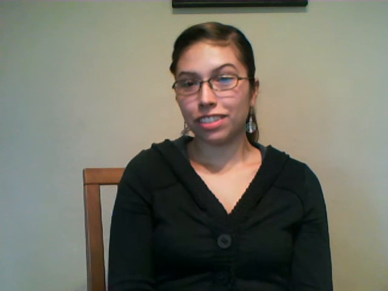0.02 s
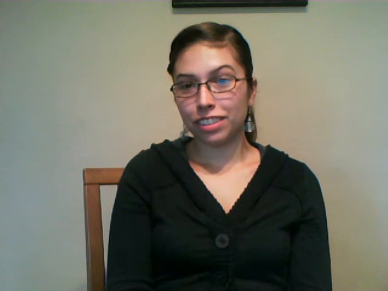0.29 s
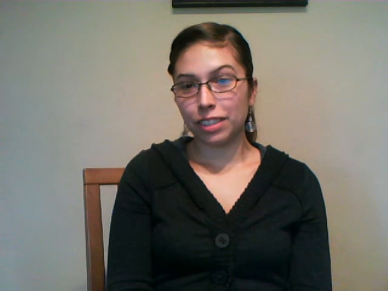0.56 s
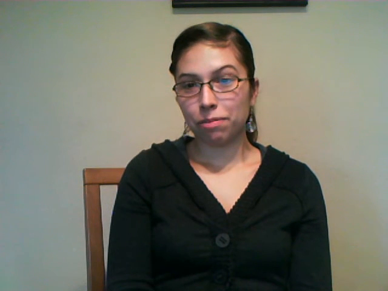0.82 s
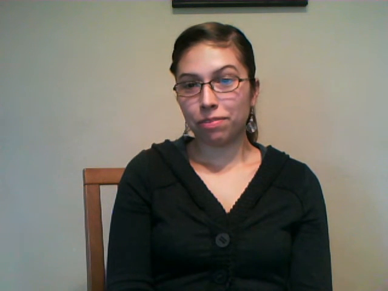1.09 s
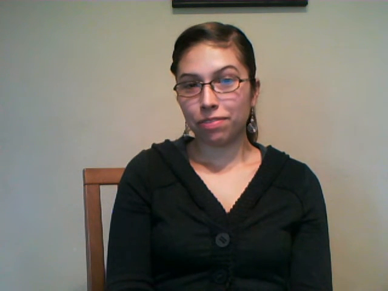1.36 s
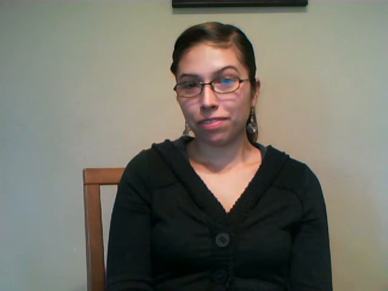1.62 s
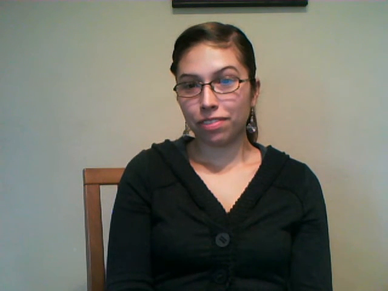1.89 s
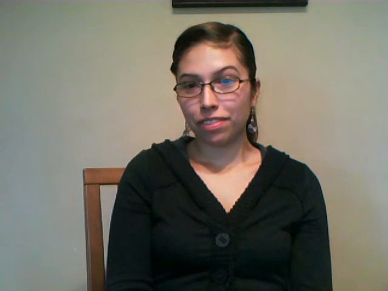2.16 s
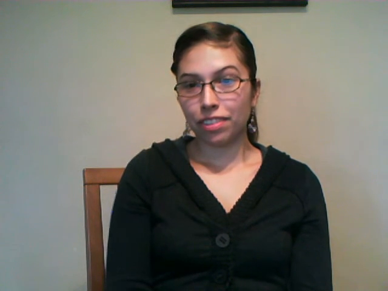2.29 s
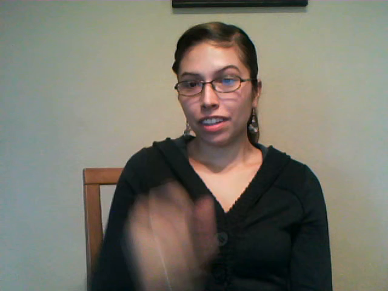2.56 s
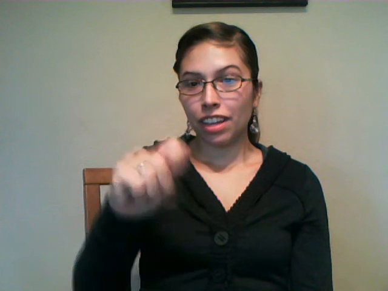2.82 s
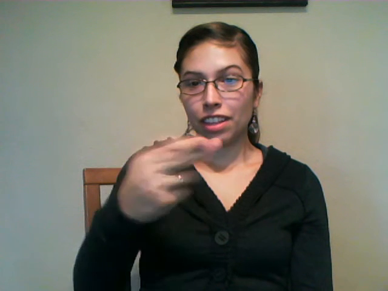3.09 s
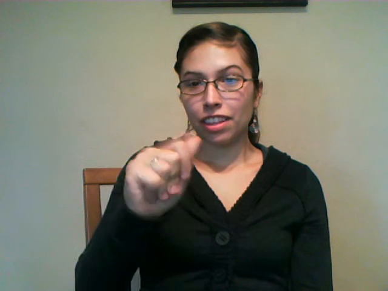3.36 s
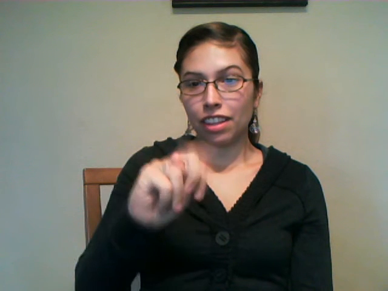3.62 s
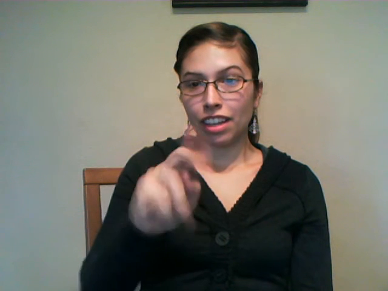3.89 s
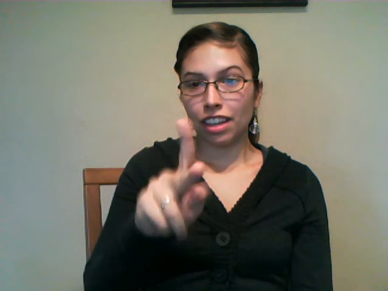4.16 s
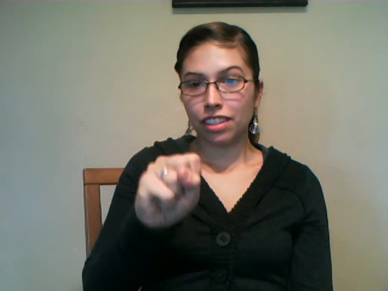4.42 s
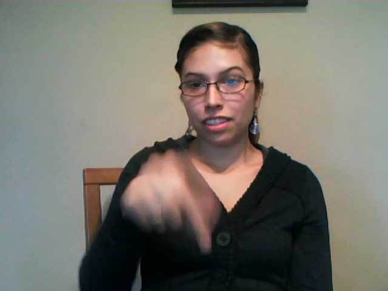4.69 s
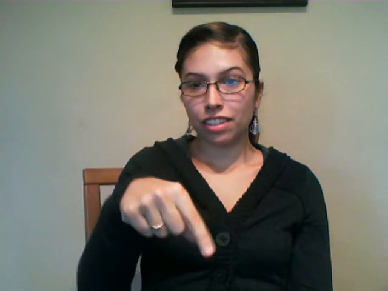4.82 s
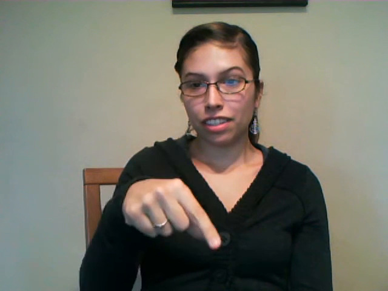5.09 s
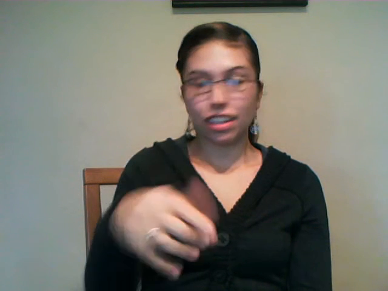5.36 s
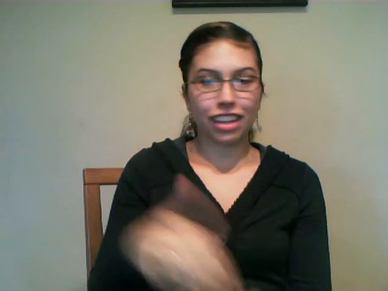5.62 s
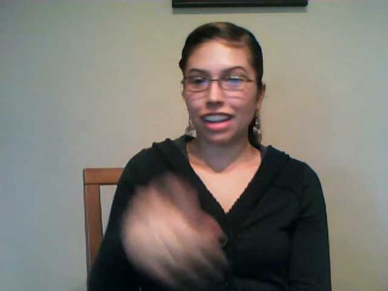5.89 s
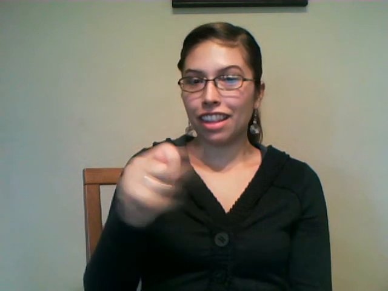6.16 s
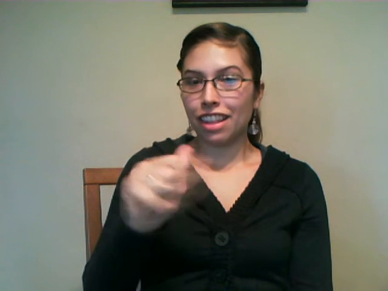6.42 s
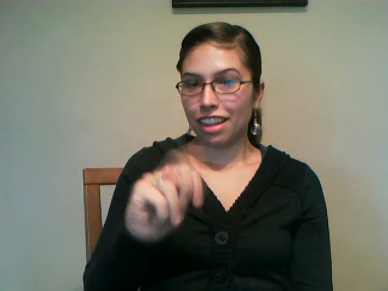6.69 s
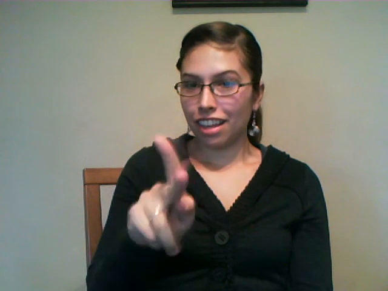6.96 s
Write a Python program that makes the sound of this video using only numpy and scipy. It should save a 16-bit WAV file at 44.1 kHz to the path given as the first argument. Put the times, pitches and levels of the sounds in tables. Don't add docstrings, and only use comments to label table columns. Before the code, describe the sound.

Steady low hum dominates throughout, with a slightly pulsating fan drone, a faint coil whine and smooth hiss. A tiny regular high-pitched interference tick runs evenly underneath. Dull soft bumps come early, then faint chair squeaks, small wooden creaks and cloth rubbing as the seated person moves their arms, clustering around five and a half seconds. Small indoor room, noisy built-in microphone, nobody talking.

```python
import sys
import numpy as np
from scipy import signal
from scipy.fft import rfft, irfft, next_fast_len
from scipy.io import wavfile
from scipy.ndimage import uniform_filter1d, map_coordinates

SR = 44100
rng = np.random.default_rng(int(sys.argv[2]) if len(sys.argv) > 2 else 0)


def amplitude_ratio(level_db):
    exponent = np.asarray(level_db, float) / 20
    return 10 ** exponent


def inscribe(sig):
    pcm = np.round(np.clip(np.atleast_2d(sig).T, -1, 1) * 32767)
    wavfile.write(sys.argv[1], SR, pcm.astype(np.int16))


N = 311963
T = np.arange(N) / SR


def wobble(rate_hz):
    knots = rng.standard_normal(int(N * rate_hz / SR) + 4)
    return map_coordinates(knots, [np.arange(N) * rate_hz / SR])


def swell(t, rise_s, fall_s):
    return np.exp(-(t / np.where(t < 0, rise_s, fall_s)) ** 2)


def filtered(x, response):
    size = next_fast_len(len(x) + 8192)
    hz = np.fft.rfftfreq(size, 1 / SR)
    return irfft(rfft(x, size) * response(hz), size)[:len(x)]


def drone(rate_hz, crest_s, harmonics, sway_rad, flutter_db, locked=False):
    turn = 2 * np.pi * rate_hz * (T - crest_s) + sway_rad * wobble(0.98)
    sound = np.zeros(N)
    for multiple, level_db in harmonics.items():
        free = multiple > 1 and not locked
        offset = rng.uniform(0, 2 * np.pi) * free
        sound += amplitude_ratio(level_db) * np.cos(multiple * turn + offset)
    return np.sqrt(2) * amplitude_ratio(flutter_db * wobble(3.1)) * sound


MAINS_HARMONICS = {1: -32, 3: -56, 4: -66, 5: -62, 6: -64, 7: -68, 8: -71, 9: -69}
FAN_A_HARMONICS = {1: -48, 3: -70, 4: -57, 6: -70, 7: -68, 8: -63, 12: -68, 13: -59, 16: -63, 20: -57, 24:
                   -64, 26: -66, 32: -78}
FAN_B_HARMONICS = {1: -49, 3: -65, 4: -62, 5: -71, 6: -65, 8: -71, 12: -69}
FAN_C_HARMONICS = {4: -59, 8: -55, 13: -68, 16: -64, 20: -57, 24: -65, 25: -66, 29: -73, 32: -78, 36: -74,
                   37: -77, 41: -78}
COIL_HARMONICS = {9: -76, 10: -76, 14: -83, 15: -80, 17: -81, 22: -86, 26: -86, 27: -78, 28: -82, 29: -88}


def machines():
    mains = drone(60.007, -.0006, MAINS_HARMONICS, sway_rad=.01, flutter_db=.1, locked=True)
    ballast = drone(120.014, .0008, {1: -51.5}, sway_rad=.05, flutter_db=.4)
    disk = drone(121.2, .0035, {1: -33.5}, sway_rad=.08, flutter_db=.15)
    pump = drone(59.39, .0078, {1: -50, 6: -67}, sway_rad=.05, flutter_db=.8)
    fan_a = drone(50.745, -.0009, FAN_A_HARMONICS, sway_rad=.01, flutter_db=.4)
    fan_b = drone(53.72, -.002, FAN_B_HARMONICS, sway_rad=.01, flutter_db=.4)
    fan_c = drone(43.476, 0, FAN_C_HARMONICS, sway_rad=.01, flutter_db=.4)
    coil = drone(228.213, 0, COIL_HARMONICS, sway_rad=.002, flutter_db=.3)
    return mains + ballast + disk + pump + fan_a + fan_b + fan_c + coil


# start_s, period_s, length_s, tone_hz
BUS_BURSTS = (.0112, .132872, .0305, 8000.01)


def bus():
    start_s, period_s, length_s, tone_hz = BUS_BURSTS
    tone_db, octave_db, edge_s = -49, -47, .0003
    since_s = (T - start_s + period_s / 2) % period_s - period_s / 2
    gate = np.clip(np.minimum(since_s, length_s - since_s) / edge_s + .5, 0, 1)
    tone = amplitude_ratio(tone_db) * np.cos(2 * np.pi * tone_hz * T)
    octave = amplitude_ratio(octave_db) * np.cos(2 * np.pi * 2 * tone_hz * T)
    return np.sqrt(2) * gate * (tone + octave)


# time of the peak in s, pitch_hz, level_db
FLOOR_THUDS = [(.44, 170, -49), (.56, 180, -43), (1.09, 190, -45), (2.45, 165, -52), (2.54, 175, -47),
               (3.07, 180, -51), (4.19, 190, -46), (4.52, 170, -51), (4.57, 180, -42), (5.58, 160, -52),
               (5.84, 190, -49), (6.498, 175, -39)]


def thuds():
    sound = np.zeros(N)
    for start_s, pitch_hz, level_db in FLOOR_THUDS:
        t = T - start_s
        shape = swell(t, rise_s=.015, fall_s=.024)
        sound += np.sqrt(2) * amplitude_ratio(level_db) * shape * np.sin(2 * np.pi * pitch_hz * t)
    return sound


def puffs(events, relative_width, rise_over_fall):
    sound = np.zeros(N + SR)
    t = np.arange(SR) / SR - .5
    for start_s, centre_hz, level_db, fall_s in events:
        resonance = lambda hz: np.exp(-2 * ((hz / centre_hz - 1) / relative_width) ** 2)
        shape = swell(t, rise_over_fall * fall_s, fall_s)
        puff = filtered(rng.standard_normal(SR), resonance) * shape
        gain = amplitude_ratio(level_db) * np.linalg.norm(shape) / np.linalg.norm(puff)
        sound[round(start_s * SR):][:SR] += gain * puff
    return sound[SR // 2:][:N]


# time of the peak in s, centre_hz, level_db, fall_s
CLOTH_RUSTLES = [(4.27, 2800, -61, .02), (4.45, 950, -49, .12), (4.56, 900, -44, .035),
                 (5.17, 2650, -55.5, .02), (5.525, 1650, -52, .04), (5.53, 2600, -59, .02),
                 (6.49, 880, -42, .03)]


def rustles():
    return puffs(CLOTH_RUSTLES, relative_width=.37, rise_over_fall=.8)


# time of the peak in s, centre_hz, level_db, fall_s
SEAT_KNOCKS = [
    (1.195, 950, -43, .012),
    (5.5, 800, -44, .025),
]


def knocks():
    return puffs(SEAT_KNOCKS, relative_width=.45, rise_over_fall=.15)


# time of the peak in s, pitch_hz, level_db, fall_s
FRAME_CREAKS = [(3.66, 905, -45, .018), (5.1, 860, -43, .009), (5.514, 1120, -41, .006),
                (5.554, 950, -44, .006), (5.61, 900, -48, .015), (6.25, 1020, -46, .022),
                (6.36, 1030, -48, .016), (6.405, 900, -45, .018)]


def creaks():
    waver_rad = .6 * wobble(60)
    sound = np.zeros(N)
    for start_s, pitch_hz, level_db, fall_s in FRAME_CREAKS:
        t = T - start_s
        shape = swell(t, .8 * fall_s, fall_s)
        sound += np.sqrt(2) * amplitude_ratio(level_db) * shape * np.sin(2 * np.pi * pitch_hz * t + waver_rad)
    return sound


# time of the peak in s, pitch_hz, level_db, half_length_s
JOINT_SQUEAKS = [(2.69, 1905, -63, .09), (3.1, 1910, -63, .045), (3.655, 1955, -59.5, .11),
                 (4.61, 1955, -59, .07)]


def squeaks():
    waver_rad = .5 * wobble(15)
    sound = np.zeros(N)
    for start_s, pitch_hz, level_db, half_s in JOINT_SQUEAKS:
        shape = swell(T - start_s, half_s, half_s)
        sound += np.sqrt(2) * amplitude_ratio(level_db) * shape * np.sin(2 * np.pi * pitch_hz * T + waver_rad)
    return sound


def rush(spectrum, patchy_db):
    z = signal.stft(rng.standard_normal(N), nperseg=512)[2]
    patches = uniform_filter1d(rng.standard_normal(z.shape), size=5, axis=0)
    patches = uniform_filter1d(patches, size=12, axis=1)
    gain = amplitude_ratio(patchy_db * patches / patches.std())
    white = signal.istft(z * gain, nperseg=512)[1][:N]
    knot_hz, knot_db = np.transpose(spectrum)

    def colour(hz):
        level_db = np.interp(np.log(hz + 1), np.log(knot_hz + 1), knot_db, right=knot_db[-1] - 9)
        return amplitude_ratio(level_db) * np.sqrt(SR / 2)

    return filtered(white / white.std(), colour)


# freq_hz, level_db_per_hz
RUMBLE_COLOUR = [(4, -69), (10, -59), (24, -57.5), (36, -66), (60, -73.5), (100, -75.5), (140, -89),
                 (200, -120)]
STREAM_COLOUR = [(60, -110), (110, -77.5), (190, -73), (260, -79), (330, -77), (450, -80.5), (560, -79.5),
                 (700, -74), (800, -77.5), (920, -75.5), (1150, -80), (1400, -84.5), (1900, -87.5),
                 (2600, -98)]
HISS_COLOUR = [(100, -94.5), (2000, -90.5), (4000, -94), (7000, -97), (10000, -98.5), (15900, -100.5)]


def air():
    rumble = amplitude_ratio(1.7 * wobble(4)) * rush(RUMBLE_COLOUR, patchy_db=2.0)
    stream = amplitude_ratio(0.39 * wobble(1.49)) * rush(STREAM_COLOUR, patchy_db=1.08)
    hiss = rush(HISS_COLOUR, patchy_db=-0.16)
    return rumble + stream + hiss


def scene():
    sitter = thuds() + rustles() + knocks() + creaks() + squeaks()
    return (machines() + bus() + sitter + air())[None]


def low_pass(x):
    return signal.sosfilt(signal.butter(12, 16680, fs=SR, output="sos"), x)


def record(dry):
    limited = filtered(dry[0], lambda hz: np.clip((15755 - hz) / 40, 0, 1))[None]
    return low_pass(limited)


dry = scene()
out = record(dry)
inscribe(out)
```